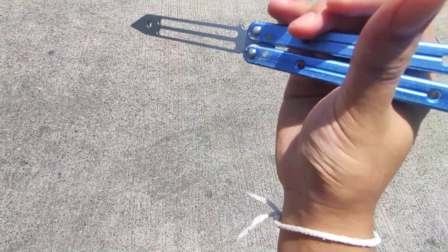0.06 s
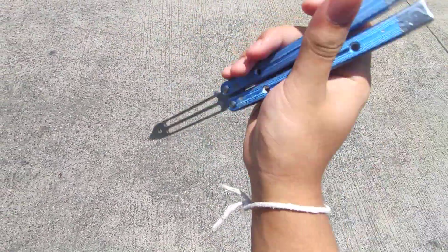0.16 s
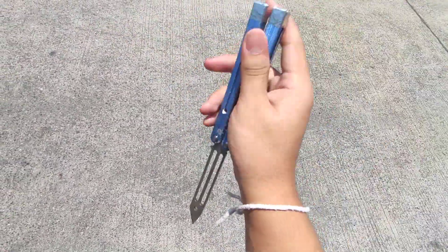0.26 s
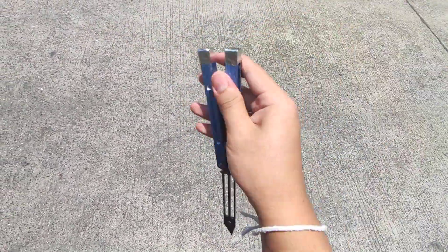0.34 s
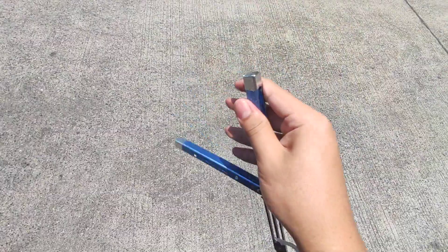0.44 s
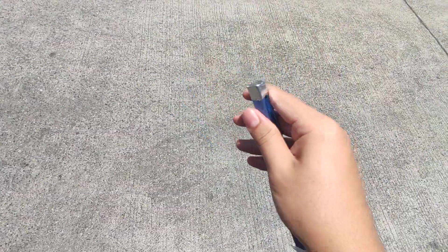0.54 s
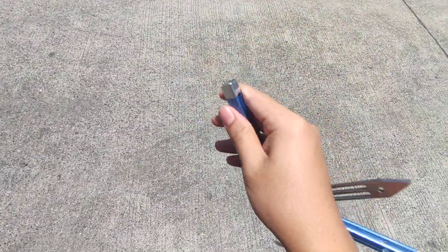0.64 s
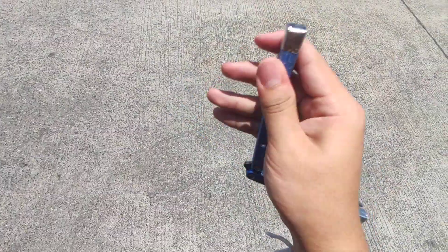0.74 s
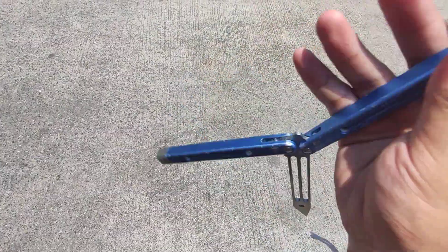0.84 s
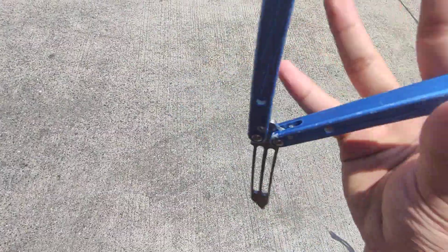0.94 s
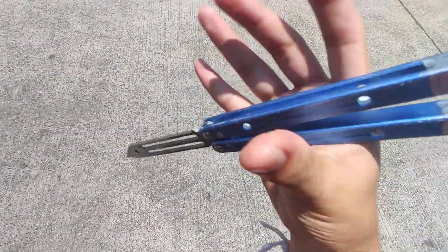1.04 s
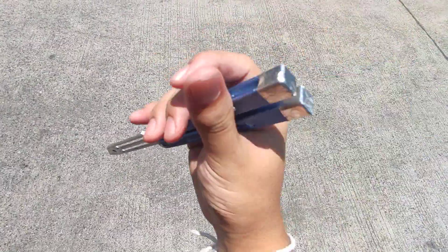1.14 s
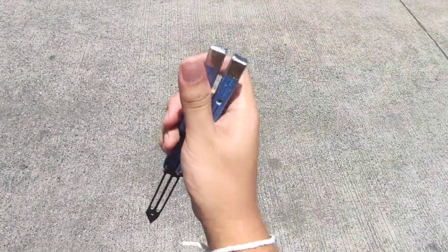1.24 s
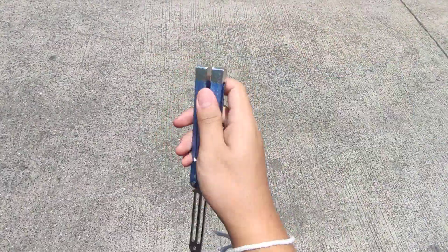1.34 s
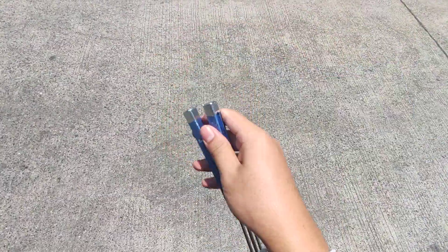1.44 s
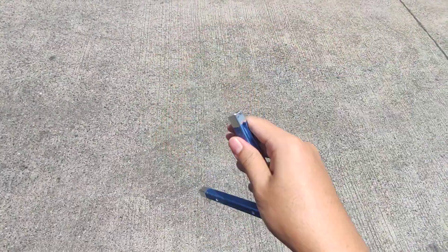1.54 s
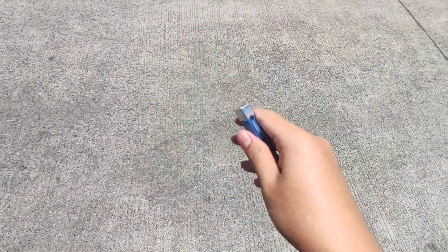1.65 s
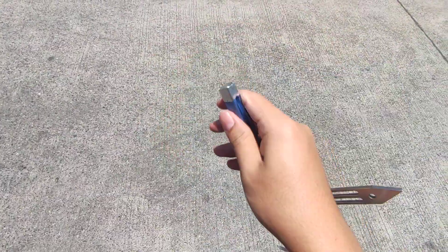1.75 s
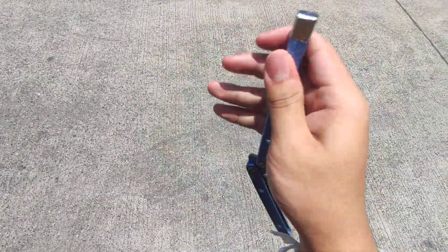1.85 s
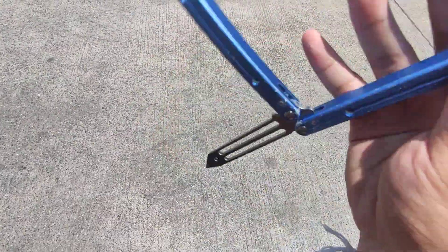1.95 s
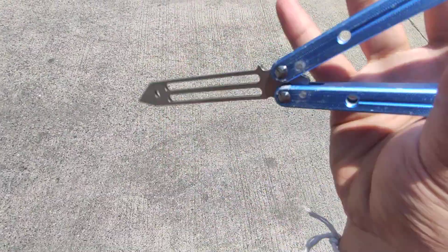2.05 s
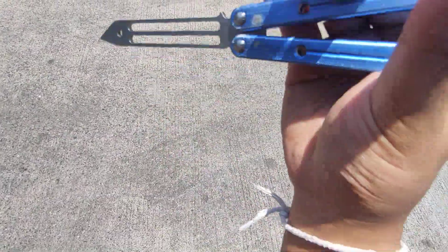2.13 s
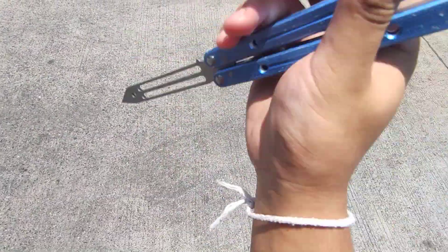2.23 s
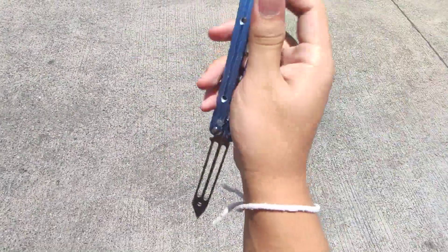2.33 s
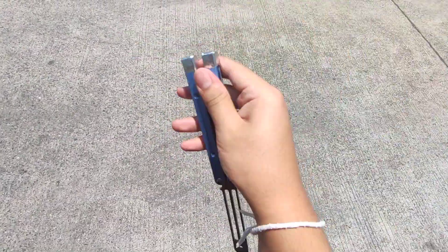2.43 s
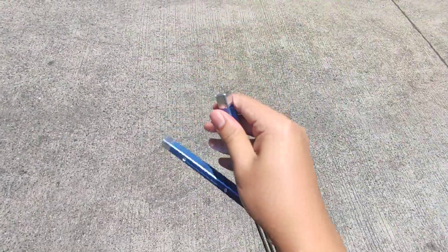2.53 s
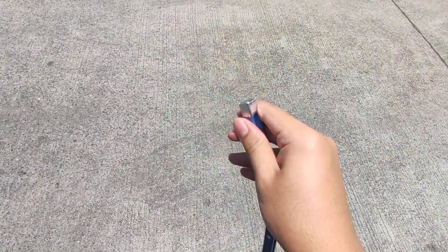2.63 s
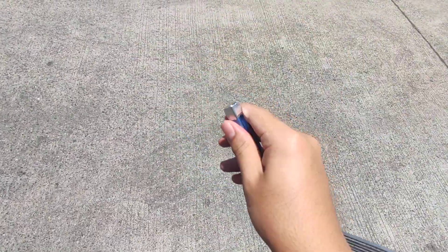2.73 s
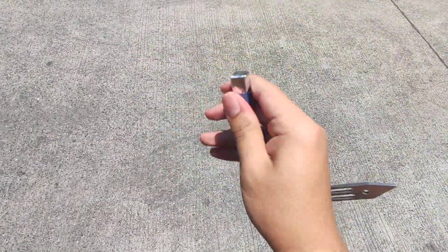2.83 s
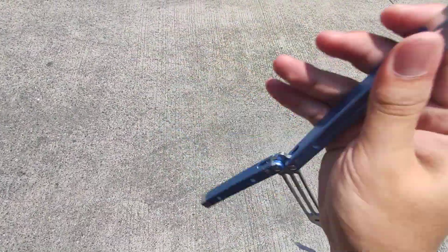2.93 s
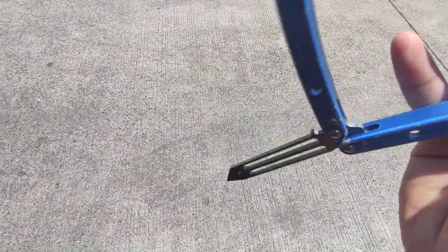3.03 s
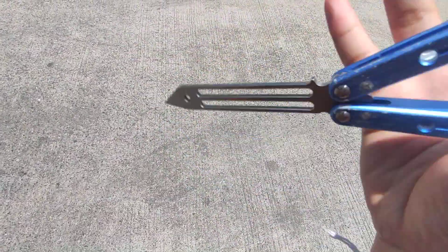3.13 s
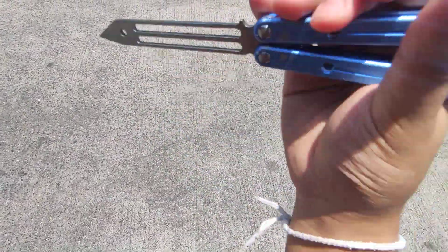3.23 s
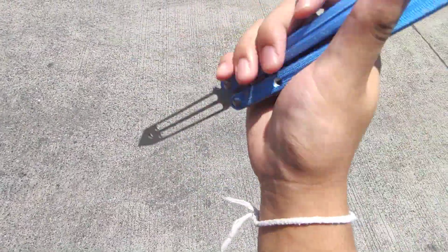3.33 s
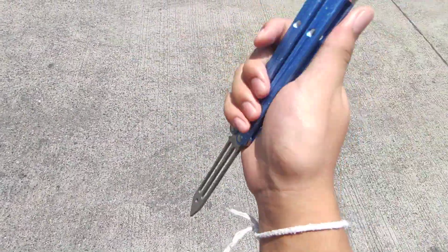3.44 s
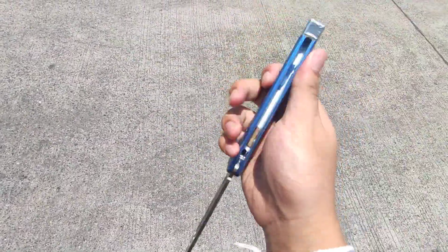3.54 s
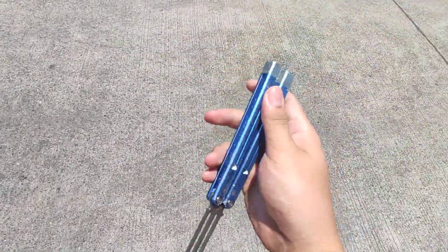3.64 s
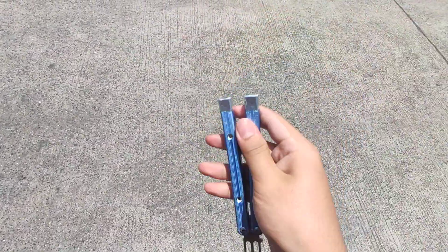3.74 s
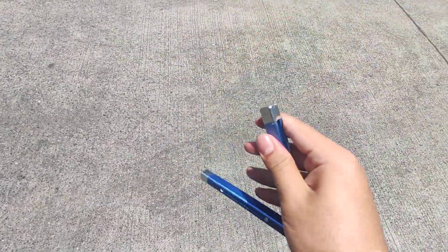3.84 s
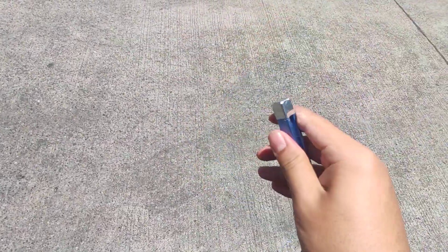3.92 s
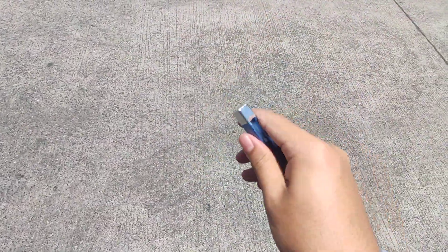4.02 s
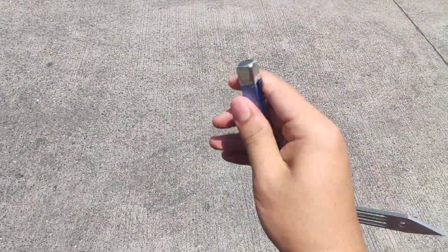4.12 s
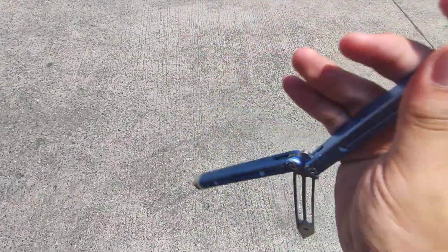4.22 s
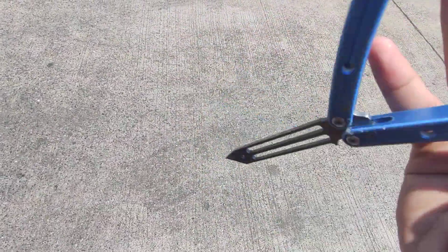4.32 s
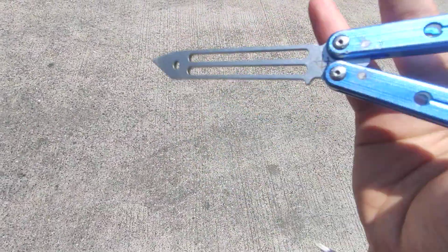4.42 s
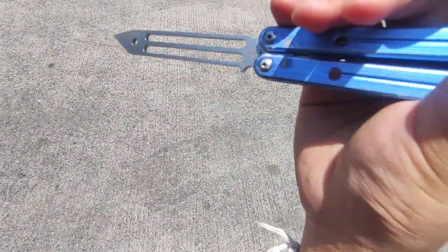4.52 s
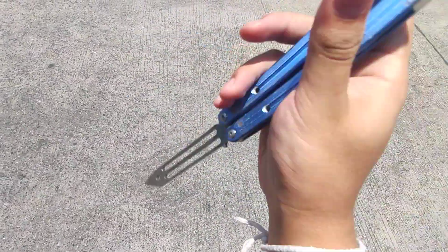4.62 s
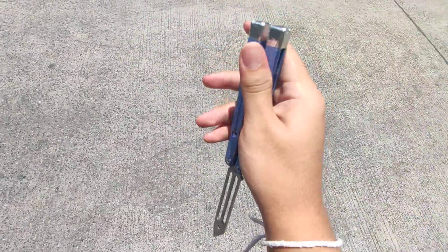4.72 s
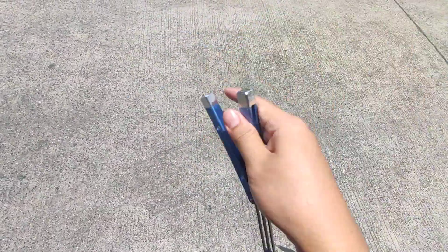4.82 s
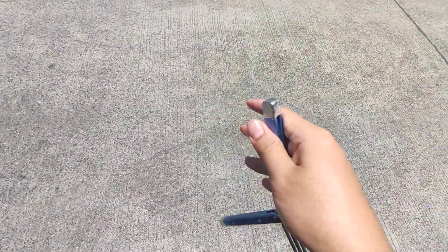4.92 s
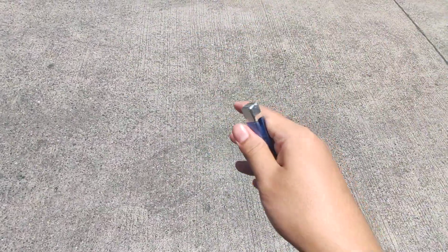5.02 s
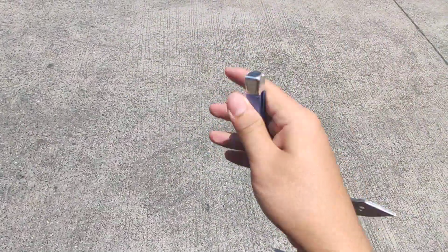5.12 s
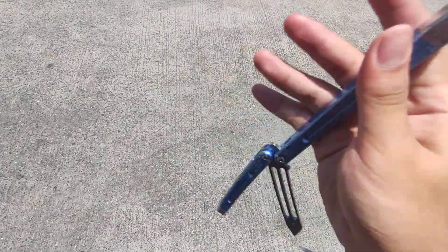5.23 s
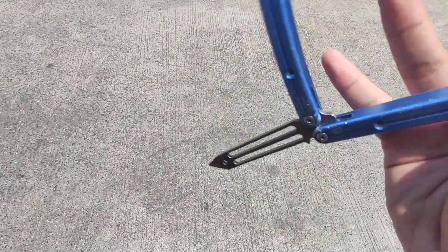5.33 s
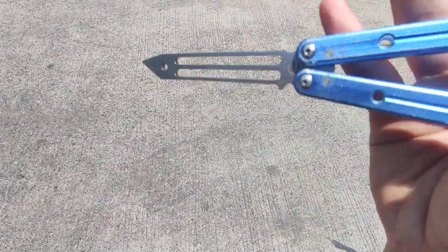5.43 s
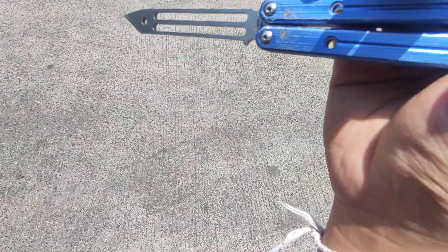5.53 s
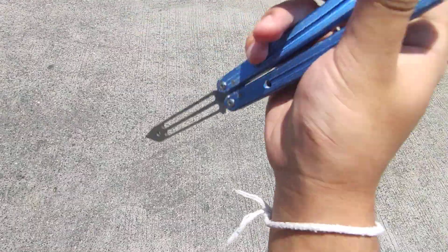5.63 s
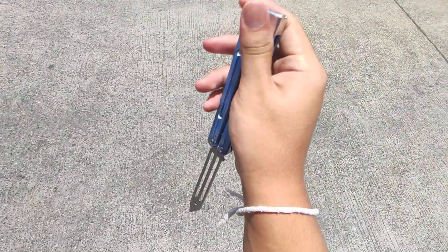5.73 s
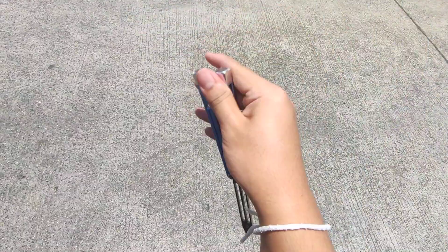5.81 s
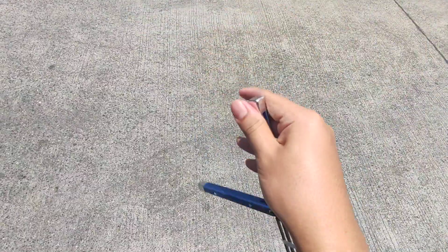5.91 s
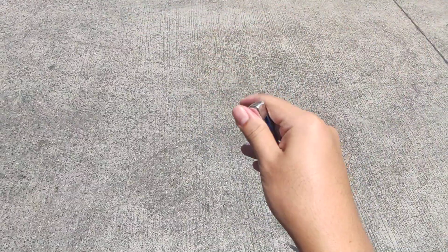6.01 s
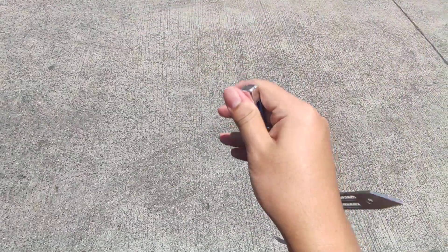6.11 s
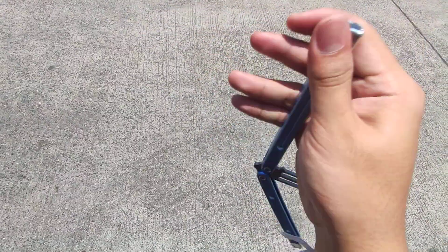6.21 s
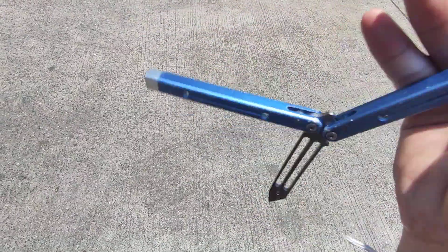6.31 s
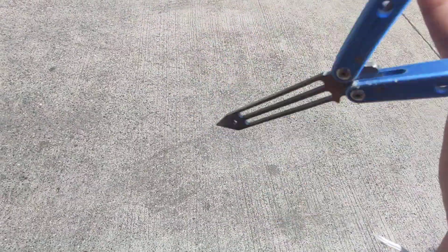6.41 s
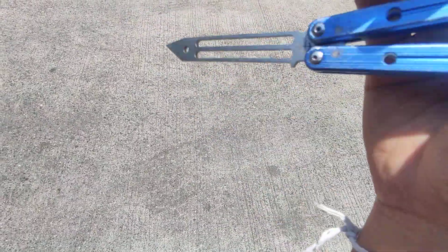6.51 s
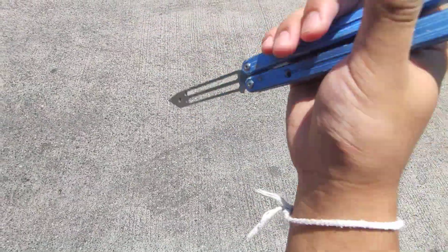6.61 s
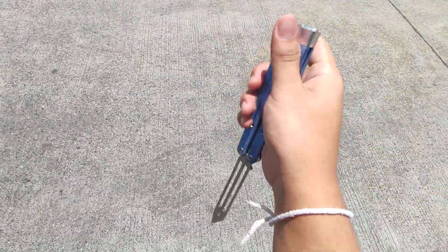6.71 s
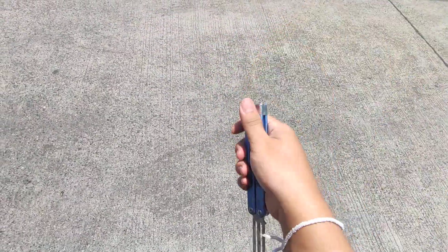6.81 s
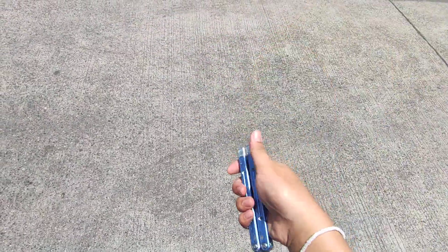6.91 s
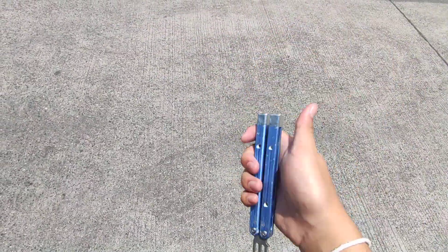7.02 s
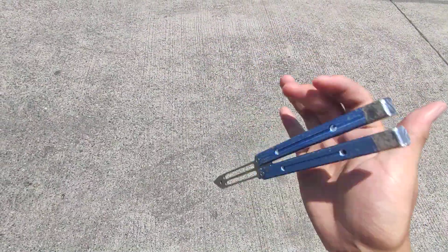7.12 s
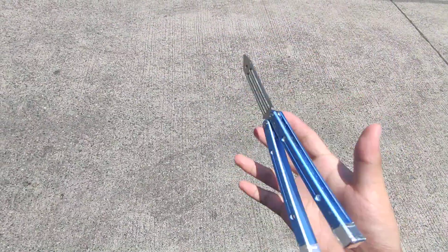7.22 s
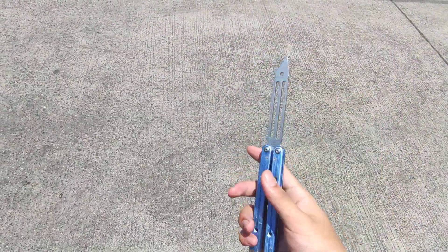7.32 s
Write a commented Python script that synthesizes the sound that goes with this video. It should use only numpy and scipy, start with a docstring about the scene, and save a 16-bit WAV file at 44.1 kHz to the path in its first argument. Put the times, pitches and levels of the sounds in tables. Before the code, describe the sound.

A butterfly knife is handled very close to a phone microphone over outdoor paving, with a soft low traffic bed throughout. Steel rings faintly at once, then a tight click cluster lands at 0.10-0.16 s. Faint bird notes follow near 0.5 s, with light taps at 0.67 and 0.85. Another clacking burst comes at 1.05-1.18, then a quiet tap at 1.75. A hard knock at 2.05 leads into dense chatter at 2.15-2.31; a small tap and faint chirps come near 2.8. Similar knocks at 3.13, 4.39 and 6.49 precede rattling claps at 3.22-3.41, 4.48-4.66 and 6.57-6.69; another burst runs 5.48-5.64. Air puffs accompany the claps, and thin, wavering steel rings die in the fingers. Soft taps fall near 3.9, 4.07, 5.1 and 6.13. A throbbing dove glides at 5.8-6.6, a low drone swells at 6.8-7.1, and faint bird notes close.

```python
"""A butterfly knife is flipped open and shut outdoors over paving, close to a phone microphone.
Distant traffic runs throughout as shaped noise; steel rings as decaying tones from the first moment.
Handles and blade soon knock, bounce, chatter and clap with a puff of air: damped modes, noise and pulses.
Far birds chirp in smeared noise bands early on and at the close; hard knocks on the blade's stop come from 2 s.
A dove's gliding, throbbing note follows near 6 s, then a brief low drone passes near 7 s."""
import sys
import numpy as np
from scipy import signal
from scipy.fft import rfft, irfft
from scipy.io import wavfile
from scipy.ndimage import uniform_filter1d

SR = 44100
rng = np.random.default_rng(int(sys.argv[2]) if len(sys.argv) > 2 else 0)


def bounce(signal):
    """Save signal as a 16-bit WAV file at the path given by the first command-line argument."""
    frames = np.transpose(np.atleast_2d(signal))
    limited = np.clip(frames, -1, 1)
    pcm = np.round(limited * 32767).astype(np.int16)
    wavfile.write(sys.argv[1], SR, pcm)


N = 324576

# Levels of the near sounds are set ahead of the yard echo and the microphone's response.
# distant traffic and hiss, relative spectrum: pitch_hz, level_db (per Hz)
TOWN_SPECTRUM = [(15, -47.5), (25, -32), (65, 3), (162, -2), (316, -1.5), (463, -5.5), (850, -17.5),
                 (1200, -29), (2240, -29.5), (3400, -40), (3900, -48), (4900, -52), (5750, -50.5),
                 (6000, -41), (7600, -42)]
# blade, held handle, blade overtone: pitch_hz, t60_s
STEEL_MODES = [(2239, .7), (2864, .4), (6165, 1.6)]
# free ringing after a contact, level before wavering:
# start_s, damped_s, blade_db, held_handle_db, blade_overtone_db
FREE_RINGS = [(0.001, 0.045, -56, -53, -58), (0.148, 0.42, -73, -62, -56.5), (0.847, 0.94, -79, -60, -76),
              (1.053, 1.145, -71, -45, -72.5), (1.178, 1.3, -71, -41.5, -76), (1.75, 1.846, -80, -66, -65),
              (2.045, 2.15, -47, -65, -74), (2.318, 2.52, -55, -38.5, -55.5), (2.781, 2.87, -72, -60, -69),
              (3.125, 3.247, -42, -66, -66), (3.34, 3.758, -63, -43, -46.5),
              (4.071, 4.2, -59.5, -80, -67.5), (4.395, 4.48, -45.5, -54, -64.5),
              (4.478, 4.63, -51, -56, -50), (4.638, 4.798, -62.5, -52.5, -58.5),
              (5.108, 5.204, -68, -78, -63.5), (5.641, 5.867, -54, -48, -59.5),
              (6.136, 6.244, -66, -65, -62), (6.487, 6.575, -47, -51, -61), (6.692, 6.95, -58, -51, -61)]
# every bounce and tap: start_s, clack_peak_db, tick_peak_db, swing_ring_db
BOUNCES = [(0.1052, -26, -19.5, -45.5), (0.128, -23, -26.5, -48), (0.1329, -13, -6.5, -34),
           (0.1373, -19.5, -2.5, -33), (0.1434, -35, -20.5, -40), (0.1472, -30.5, -15, -60),
           (0.161, -34.5, -27.5, -50.5), (0.6688, -40.5, -30, -54), (0.8467, -34.5, -29, -57),
           (0.9805, -43, -54, -68), (1.0522, -22, -12, -47), (1.0982, -16, -8.5, -29),
           (1.1399, -29, -12, -34.5), (1.1466, -21.5, -9, -20), (1.1497, -40.5, -6, -19),
           (1.1551, -20, -13, -22), (1.165, -29.5, -15.5, -25), (1.176, -23.5, -9.5, -35.5),
           (1.7453, -36, -22, -51), (1.749, -45, -30.5, -46), (2.1475, -15, -15, -35.5),
           (2.1786, -13, -11.5, -37), (2.1984, -16.5, -11.5, -19), (2.207, -16, -7, -46),
           (2.2173, -15, -10.5, -36), (2.23, -22.5, -20.5, -30), (2.2457, -19, -11, -39.5),
           (2.2623, -27.5, -14, -27), (2.269, -29, -22, -40.5), (2.2764, -30, -16.5, -35.5),
           (2.285, -30.5, -5.5, -26), (2.2918, -22, -12.5, -31), (2.298, -19.5, -13, -30.5),
           (2.3056, -35.5, -21, -38), (2.3122, -29, -19.5, -52.5), (2.781, -34.5, -22.5, -47),
           (3.2171, -19.5, -13.5, -46.5), (3.248, -37.5, -28, -53.5), (3.261, -15, -11.5, -34),
           (3.28, -26, -8.5, -26), (3.2908, -14.5, -10, -37), (3.3, -31.5, -9, -31), (3.312, -16, -18, -30),
           (3.3229, -18.5, -18, -24.5), (3.3317, -39, -18.5, -33), (3.3401, -18.5, -12.5, -31.5),
           (3.3693, -22.5, -22, -45.5), (3.3864, -44, -27.5, -36), (3.3923, -27.5, -23, -39.5),
           (3.41, -40, -35, -60), (3.8859, -40.5, -43.5, -58), (4.071, -37.5, -34.5, -67),
           (4.4773, -17, -17, -30), (4.5017, -16, -14.5, -41.5), (4.519, -42, -20, -54),
           (4.534, -14, -9.5, -40), (4.56, -15.5, -9.5, -31.5), (4.583, -19, -9.5, -44.5),
           (4.609, -21, -13, -37), (4.628, -24.5, -13.5, -66), (4.6342, -26, -6.5, -30),
           (4.639, -22.5, -17.5, -56), (4.661, -55, -42.5, -69), (5.1073, -33, -30, -54.5),
           (5.484, -50, -52, -59), (5.504, -17, -13, -32.5), (5.5301, -21, -7, -25.5),
           (5.5452, -28, -9, -25.5), (5.5524, -15.5, -11.5, -23), (5.56, -12, -5.5, -32),
           (5.5725, -15, -12, -38.5), (5.585, -23.5, -11.5, -32), (5.601, -30.5, -14, -41),
           (5.6138, -26.5, -14.5, -39), (5.6219, -29.5, -10.5, -36.5), (5.6306, -35.5, -15.5, -35),
           (5.6357, -34, -19.5, -41), (5.641, -34, -26.5, -72), (6.1303, -37, -33, -44),
           (6.1363, -44.5, -37.5, -73), (6.5705, -18.5, -15.5, -27), (6.5817, -35, -17, -34),
           (6.602, -15, -7.5, -39), (6.6161, -25.5, -11.5, -20), (6.625, -21, -5, -25),
           (6.6329, -19.5, -13, -23), (6.64, -20.5, -12.5, -32.5), (6.6498, -28.5, -15.5, -32.5),
           (6.66, -31, -19.5, -33), (6.6667, -28, -14.5, -41), (6.6741, -25, -17, -34),
           (6.6782, -28, -12.5, -37), (6.6804, -25, -14, -38), (6.686, -27.5, -16.5, -44),
           (6.6923, -28.5, -16, -45)]
# short handle modes damped by the grip, mean and relative: pitch_hz, level_db
CLACK_MODES = [(2150, -14), (2310, 3.5), (2520, 13), (2740, 20), (3050, 9.5), (3500, -5.5), (3950, -15.5),
               (4450, -27)]
# bright short modes damped by the grip, mean and relative: pitch_hz, level_db
TICK_MODES = [(4900, -20.5), (5400, -17.5), (5900, -13.5), (6350, -5), (6850, -3), (7200, 7.5),
              (7470, 12.5)]
# swinging handle, mean pitch, level relative to swing_ring_db: pitch_hz, level_db, t60_s
SWING_MODES = [(2973, 3.5, 0.14), (2300, -5, 0.071)]
# handles landing in the palm or clapping shut, air levels before the band-pass:
# start_s, suction_peak_db, squeeze_peak_db, knock_peak_db
AIR_PUFFS = [(0.1368, -22.5, -28, -40.5), (0.985, -45, -49, -34.5), (1.1493, -15, -32.5, -22),
             (2.21, -13.5, -33, -23.5), (2.2183, -27.5, -28.5, -23.5), (3.2614, -20.5, -33, -44),
             (3.2818, -20, -38, -26), (3.2936, -7.5, -19, -17.5), (3.3032, -29.5, -11, -19.5),
             (4.5347, -17, -30, -25), (4.636, -38, -38, -26), (5.5326, -35, -23, -29),
             (5.5463, -12.5, -29, -27.5), (5.5555, -15.5, -16.5, -20.5), (5.5634, -25.5, -33.5, -28),
             (5.5759, -23.5, -21.5, -25.5), (6.612, -27, -46.5, -33), (6.627, -16.5, -16.5, -20),
             (6.6357, -24, -11, -19.5)]
# far bird notes: start_s, length_s, centre_hz, width_hz, level_db (before the swell and decay)
BIRD_NOTES = [(0.472, 0.12, 4570, 896, -68), (0.521, 0.077, 3220, 200, -67.5),
              (2.826, 0.11, 4480, 786, -68.5), (2.847, 0.072, 3340, 148, -64),
              (7.055, 0.19, 2830, 50.6, -65.5), (7.097, 0.24, 2326, 70.4, -65.5)]
# hard knocks against the blade's stop: start_s, low_modes_peak_db, high_modes_peak_db
STOP_KNOCKS = [(2.0451, -16.5, -9), (3.125, -5.5, -14), (4.3946, -7, -11), (6.4867, -9.5, -14.5)]
# modes of a stop knock, mean and relative: pitch_hz, level_db
STOP_MODES = [(1750, -32), (2340, -8), (2700, 0), (3050, -13), (3500, 1), (3850, -10), (4400, -17),
              (4800, -20), (5200, -15), (5700, -18), (6050, -12), (6330, -12), (6950, -6), (7280, 0),
              (7490, -2)]
# dove notes, throb depth (0-1) and a curve before throb and echo: time_s, pitch_hz, level_db
DOVE_NOTES = [(.12, [(5.82, 560, -52.5), (5.87, 649, -45), (5.89, 746, -41.5), (5.95, 758.5, -40),
              (6.02, 740, -46), (6.09, 720, -63)]), (.75, [(6.14, 574, -43), (6.18, 735, -48),
              (6.3, 728, -47.5), (6.42, 690, -46.5), (6.53, 582.5, -42), (6.6, 500, -49)])]
# low drone, curve before throb and waver: time_s, pitch_hz, level_db
DRONE_CURVE = [(6.82, 98.6, -57), (6.908, 92.3, -36.5), (7.068, 90.6, -41.5), (7.14, 95.5, -60.5)]

TOWN_DB, HISS_DB = -40.5, -62.5
CLACK_T60_S, TICK_T60_S, STOP_T60_S = .02, .012, .013
TILT_DB, TILT_SPREAD_DB = -1.3, 3.5  # per half octave; the struck spot varies from blow to blow
KNOCK_LEAD_S, KNOCK_UNDER_CLACK_DB = .003, -22.5
YARD_T60_S, YARD_RISE_S = .45, .04
STOP_RISE_S = .001
# dip in the phone's response to the near sound; depth is a share of amplitude, 0-1
MIC_DIP_HZ, MIC_DIP_WIDTH_HZ, MIC_DIP_SHARE = 4800, 1100, .55
TOP_HZ = 7570  # upper edge of what the phone keeps


def undb(db):
    """Decibels to gain."""
    return 10 ** (np.asarray(db) / 20)


def fade(t, t60):
    """Exponential decay that loses 60 dB in t60 seconds."""
    return np.exp(-np.log(1000) * t / t60)


def add(out, s, x):
    """Mix x into out from second s."""
    i = int(s * SR)
    out[i:i + len(x)] += x[:N - i]


def band(x, lo_hz, hi_hz):
    """Band-pass."""
    return signal.sosfilt(signal.butter(2, [lo_hz, hi_hz], "band", fs=SR, output="sos"), x)


def unit(x):
    """Scale to rms 1."""
    return x / np.sqrt(np.mean(x ** 2))


def peak_at(x, db):
    """Scale the highest peak to db."""
    return x * undb(db) / np.abs(x).max()


def walk(rate):
    """Random levels held 1 / rate s and smoothed twice; spread near 1."""
    k = int(SR / rate)
    held = np.repeat(rng.standard_normal(N // k + 1), k)
    return 1.3 * uniform_filter1d(uniform_filter1d(held, k), k)[:N]


def town():
    """Half-octave noise bands of distant traffic and hiss that swell together and flicker alone."""
    hz = np.maximum(np.fft.rfftfreq(N, 1 / SR), 1)
    table_hz, table_db = np.transpose(TOWN_SPECTRUM)
    colour = undb(np.interp(np.log(hz), np.log(table_hz), table_db))
    noise = rfft(rng.standard_normal(N)) * colour
    traffic, hiss = np.zeros(N), np.zeros(N)
    swell = walk(0.74)
    for k in range(20):
        # triangular bands, centred every half octave from 16 Hz
        share = np.maximum(1 - np.abs(2 * np.log2(hz / 16) - k), 0)
        part = irfft(noise * share, N)
        part *= undb(.5 * swell + 1.1 * walk(3) + 1.1 * walk(12))
        if k < 13:
            traffic += part
        else:
            hiss += part
    return unit(traffic) * undb(TOWN_DB) + unit(hiss) * undb(HISS_DB)


def tone(hz, t60, length, db, phase, rise, damp):
    """A mode that grows out of the blow, decays, and is damped over its last damp seconds."""
    t = np.arange(int(length * SR)) / SR
    edges = np.minimum(1, np.minimum(t / rise, (length - t) / damp))
    return undb(db) * edges * fade(t, t60) * np.sin(2 * np.pi * (hz * t + phase))


def steel():
    """Blade and held handle ring while untouched, wavering as they turn and dying in the fingers."""
    out = np.zeros(N)
    for (hz, t60), column in zip(STEEL_MODES, (2, 3, 4)):
        mode = np.zeros(N)
        for row, phase in zip(FREE_RINGS, rng.random(len(FREE_RINGS))):
            length = row[1] - row[0]
            damp = max(.003, .6 * (length - .1))  # longer rings are damped more gently
            add(mode, row[0], tone(hz, t60, length, row[column], phase, rise=0.0053, damp=damp))
        out += mode * undb(2.5 * walk(30) + 2.5 * walk(12))
    return out


def chatter(noise):
    """The parts chatter against each other for a few milliseconds."""
    t = np.arange(len(noise)) / SR
    return noise * t ** 2 * np.exp(-t / .0007)


def blow(modes, t60, scrape, chance, tilt_db, db):
    """One rough contact excites each mode by its own chance amount; the struck spot tilts the set."""
    t = np.arange(1024) / SR
    hz, mode_db = np.transpose(modes)[:, :, None]
    half_octaves = 2 * np.log2(hz / np.mean(hz))
    mode_db = mode_db + tilt_db * half_octaves + 4.5 * chance[1][:, None]
    hz = hz * (1 + 0.02 * chance[0][:, None])
    ring = np.sum(undb(mode_db) * fade(t, t60) * np.sin(2 * np.pi * hz * t), axis=0)
    struck = signal.fftconvolve(scrape, ring)[:len(t)]
    # a slim bar radiates nothing far below its lowest mode
    return peak_at(band(struck, .9 * modes[0][0], 9000), db)


def knock(noise, db):
    """The dull low part of a contact: one-sided chatter through a low band."""
    return peak_at(band(chatter(np.abs(noise)), 450, 1200), db)


def contacts():
    """Clack, tick and knock of each contact; the swinging handle rings on, at most until it lands again."""
    out = np.zeros(N)
    clack_draws, tick_draws = 2 * len(CLACK_MODES), 2 * len(TICK_MODES)
    chance = rng.standard_normal((len(BOUNCES), 512 + clack_draws + tick_draws + 2))
    cuts = np.cumsum([256, 256, clack_draws, tick_draws])
    ends = [row[0] for row in BOUNCES[1:]] + [N / SR]
    for (s, clack_db, tick_db, swing_db), end, c in zip(BOUNCES, ends, chance):
        low, high, clack_chance, tick_chance, (pitch, spot) = np.split(c, cuts)
        tilt_db = TILT_DB + TILT_SPREAD_DB * spot
        clack = blow(CLACK_MODES, CLACK_T60_S, chatter(low), clack_chance.reshape(2, -1), tilt_db, clack_db)
        tick = blow(TICK_MODES, TICK_T60_S, chatter(high), tick_chance.reshape(2, -1), 0, tick_db)
        add(out, s - .001, clack)
        add(out, s - .001, tick)
        add(out, s, knock(low, clack_db + KNOCK_UNDER_CLACK_DB))
        for hz, db, t60 in SWING_MODES:
            length = min(end - s + .002, t60)
            swing_hz = hz * (1 + .004 * pitch)
            ring = tone(swing_hz, t60, length, swing_db + db, c[0], rise=0.00064, damp=0.00067)
            add(out, s + 0.00084, ring)
    return out


def rattle():
    """Each bounce shakes the loose pivots: a dense fine chatter that settles quickly, then slowly."""
    energy, t = np.zeros(N), np.arange(SR // 3) / SR
    # decays of energy; the square root below turns them into amplitude
    settle = fade(t, 0.026) + undb(-37.5) * fade(t, .18)
    for s, _, tick_db, _ in BOUNCES:
        add(energy, s, undb(tick_db) ** 2 * settle)
    ticks = rng.standard_normal(N) * undb(2.5 * rng.exponential(size=N))  # spiky noise
    low, high = unit(band(ticks, 2200, 4000)), unit(band(ticks, 5200, 7400))
    return np.sqrt(energy) * (undb(-30.5) * low + undb(-27.0) * high)


def yard(x, db):
    """A diffuse echo that builds as paving and walls answer."""
    t = np.arange(SR // 2) / SR
    tail = rng.standard_normal(len(t)) * fade(t, YARD_T60_S) * np.minimum(t / YARD_RISE_S, 1)
    return signal.fftconvolve(x, undb(db) * tail / np.sqrt(np.sum(tail ** 2)))[:N]


def puffs():
    """Air is squeezed out as the handles close, then sucked back at the clap, over a dull knock."""
    air, knocks = np.zeros(N), np.zeros(N)
    t = np.arange(-882, 882) / SR  # 20 ms either side of the clap
    squeeze = np.exp(np.minimum(t + 0.0012, 0) / 0.0035) / (1 + np.exp((t + 0.0013) / 0.00022))
    suction = np.exp(-(np.minimum(t, 0) / .0011) ** 2 - (np.maximum(t, 0) / 0.0018) ** 2)
    noises = rng.standard_normal((len(AIR_PUFFS), 256))
    for (s, suck_db, squeeze_db, knock_db), noise in zip(AIR_PUFFS, noises):
        add(air, s + t[0], undb(squeeze_db) * squeeze - undb(suck_db) * suction)
        add(knocks, s - KNOCK_LEAD_S, knock(noise, knock_db))
    return band(air, 32, 3000) + knocks


def birds():
    """Far chirps arrive as narrow noise bands, smeared by echoes, that die away."""
    out = np.zeros(N)
    for s, length, hz, width, db in BIRD_NOTES:
        t = np.arange(int(2 * length * SR)) / SR
        smear = unit(band(rng.standard_normal(len(t)), hz - width / 2, hz + width / 2))
        add(out, s, undb(db) * smear * np.minimum(t / 0.01, 1) * np.exp(-(t / length) ** 2))
    return out


def catches():
    """The swinging handle meets the blade's stop in one hard knock that spreads along the bar."""
    out, t = np.zeros(N), np.arange(1024) / SR
    hz, mode_db = np.transpose(STOP_MODES)[:, :, None]
    swell = (1 - np.exp(-t / STOP_RISE_S)) ** 2 * fade(t, STOP_T60_S)
    chance = rng.standard_normal((len(STOP_KNOCKS), 3, len(STOP_MODES), 1))
    for (s, low_db, high_db), (level, pitch, phase) in zip(STOP_KNOCKS, chance):
        wave = np.sin(2 * np.pi * (hz * (1 + .015 * pitch) * t + phase))
        modes = undb(mode_db + 1.5 * level) * swell * wave
        # a mode listed at exactly 4800 Hz falls in neither group and stays silent
        low = modes[hz[:, 0] < 4800].sum(axis=0)
        high = modes[hz[:, 0] > 4800].sum(axis=0)
        add(out, s - .0005, peak_at(low, low_db))
        add(out, s - .0005, peak_at(high, high_db))
    return out


def glide(rows, depth, throb_hz):
    """A near-pure note along a pitch and level curve, throbbing unevenly, with soft ends."""
    out = np.zeros(N)
    s, hz, db = np.transpose(rows)
    t = np.arange(s[0], s[-1], 1 / SR)
    edges = np.minimum(1, np.minimum(t - s[0], s[-1] - t) / 0.016)
    throb_rate = throb_hz * (1 + 0.24 * walk(15.14)[:len(t)])
    throb = np.sin(2 * np.pi * np.cumsum(throb_rate) / SR)
    gain = np.sqrt(2) * undb(np.interp(t, s, db)) * (1 + np.clip(depth, 0, 1) * throb)
    waver = 1 + .03 * depth * walk(40)[:len(t)]
    pitch = waver * np.interp(t, s, hz)
    add(out, s[0], gain * edges * np.sin(2 * np.pi * np.cumsum(pitch) / SR))
    return out


def dove():
    """Throbbing, gliding dove notes with their echo from the yard."""
    notes = sum(glide(note, depth, throb_hz=45) for depth, note in DOVE_NOTES)
    return notes + yard(notes, db=-8)


def drone():
    """A brief low tone that swells and fades with a slight throb."""
    return glide(DRONE_CURVE, .2, throb_hz=10)


def scene():
    """Knife near the phone over the outdoor background."""
    far = town() + birds() + dove() + drone()
    bounces, knocks = contacts(), catches()
    knife = bounces + knocks + yard(bounces + undb(-8) * knocks, db=-29)
    # the phone's housing shades a band of the near sound
    peak = signal.iirpeak(MIC_DIP_HZ, MIC_DIP_HZ / MIC_DIP_WIDTH_HZ, fs=SR)
    knife = knife - np.clip(MIC_DIP_SHARE, 0, 1) * signal.lfilter(*peak, knife)
    return (knife + rattle() + steel() + puffs() + far)[None]


def record(dry):
    """The phone cuts the top; its steep even-delay filter rings on both sides of a click."""
    return signal.sosfiltfilt(signal.ellip(10, .1, 32, TOP_HZ, fs=SR, output="sos"), dry)


dry = scene()
out = record(dry)
bounce(out)
```